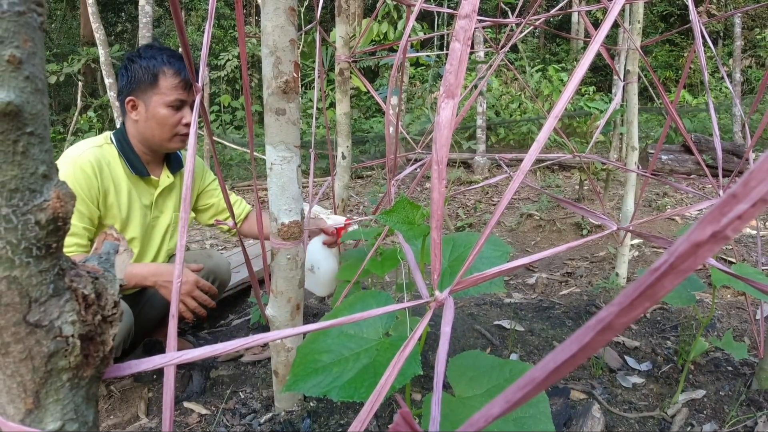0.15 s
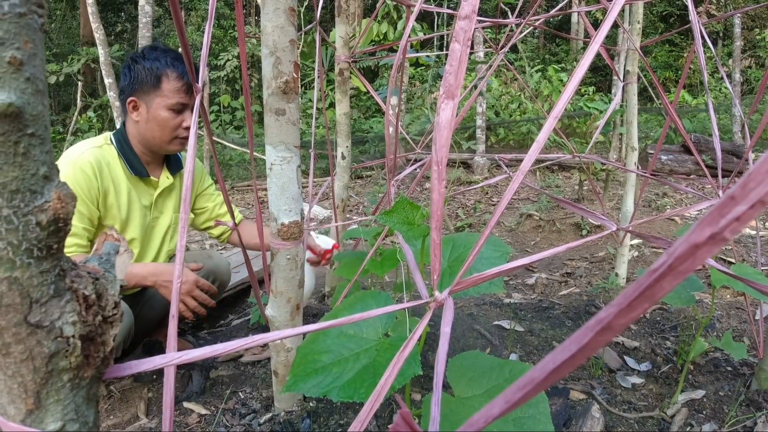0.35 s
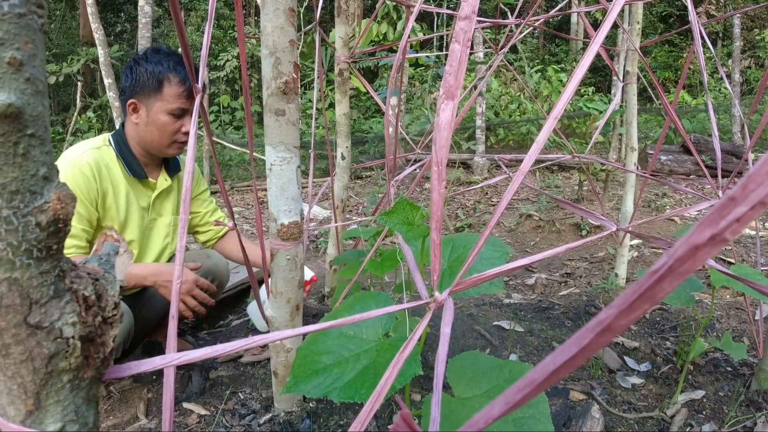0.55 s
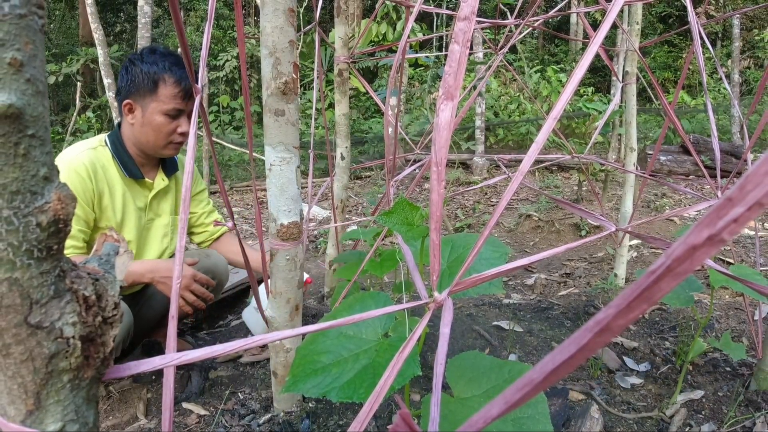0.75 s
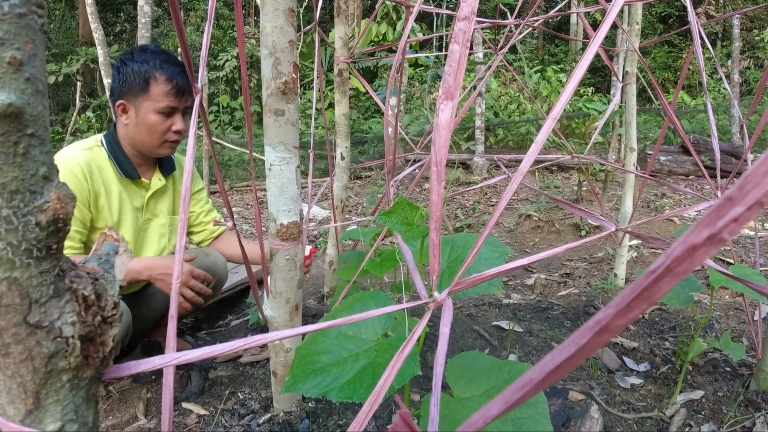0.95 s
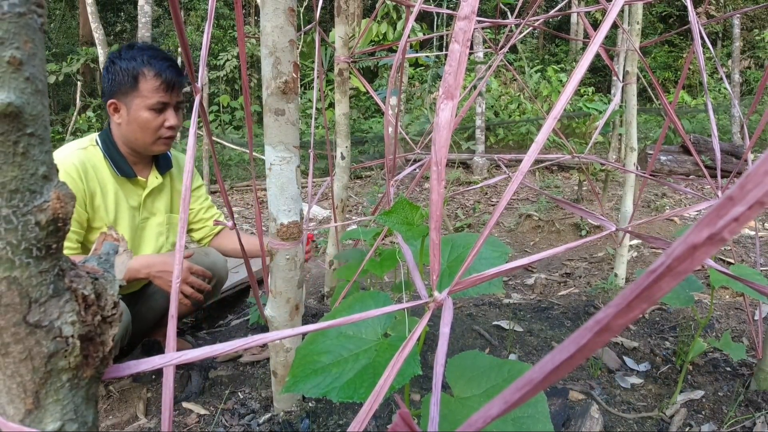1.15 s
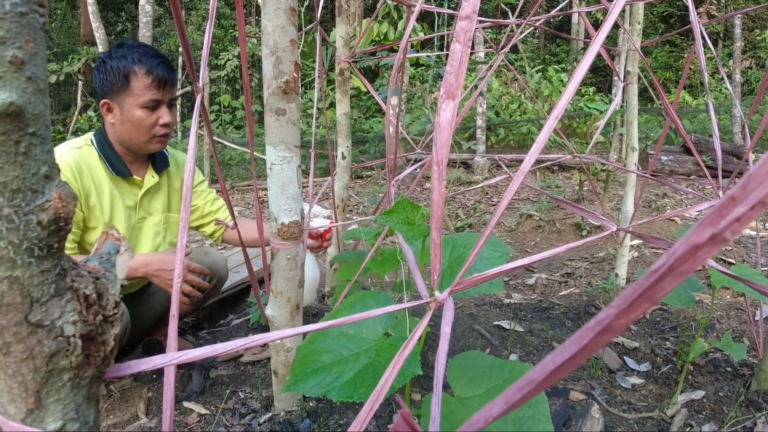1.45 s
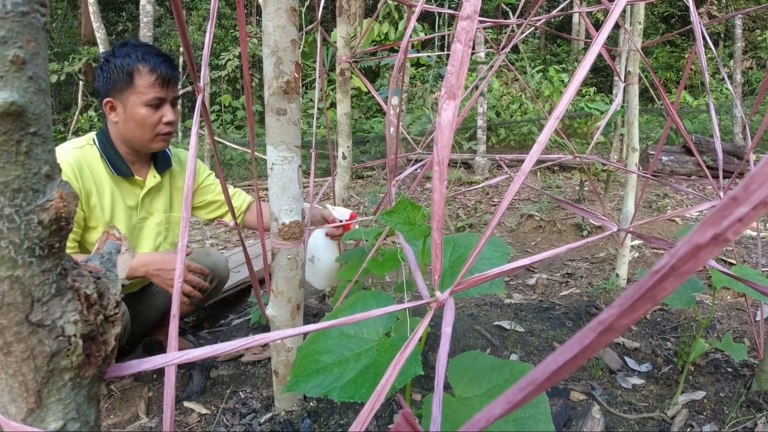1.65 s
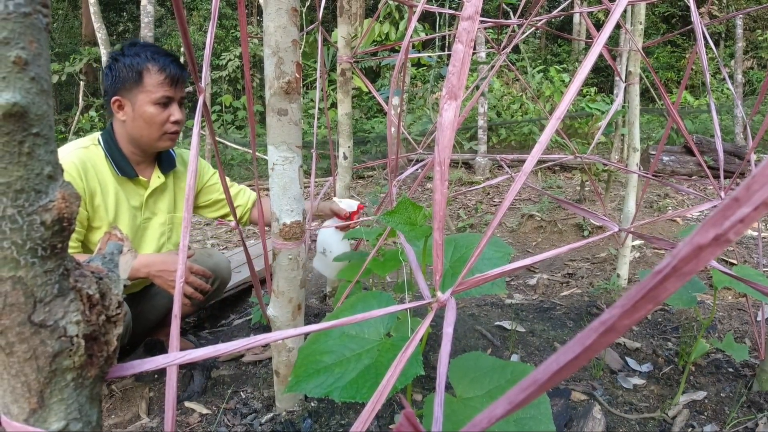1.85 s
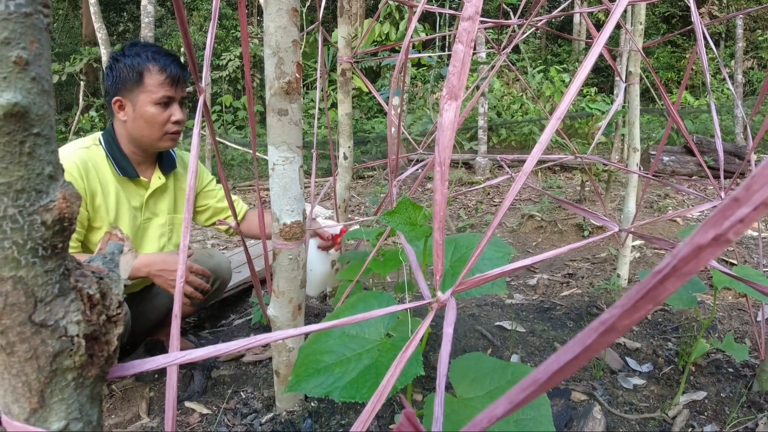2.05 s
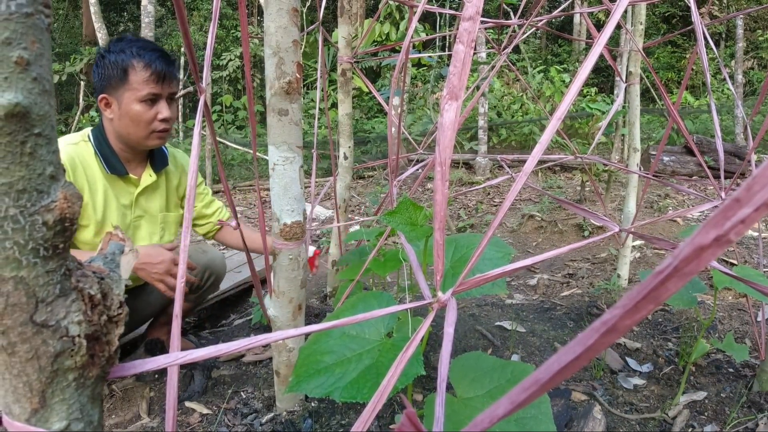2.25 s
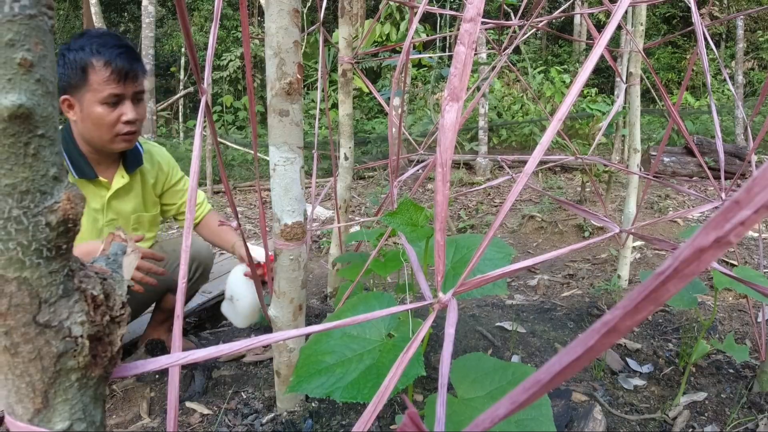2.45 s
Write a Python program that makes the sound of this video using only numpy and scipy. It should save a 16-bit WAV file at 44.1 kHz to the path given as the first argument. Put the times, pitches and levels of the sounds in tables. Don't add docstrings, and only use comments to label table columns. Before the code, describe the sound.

A trigger spray bottle is pumped eight times at a steady quick pace, each short hissing spurt spattering on bark, with plastic clicks between; close microphone outdoors, soft insects and a faint distant engine.

```python
import sys
import numpy as np
from scipy import signal
from scipy.fft import rfft, irfft
from scipy.io import wavfile
from scipy.ndimage import uniform_filter1d

SR = 44100
rng = np.random.default_rng(int(sys.argv[2]) if len(sys.argv) > 2 else 0)


def digitize_waveform(pressure):
    field = np.atleast_2d(pressure).T
    bounded = np.clip(field, -1, 1)
    quanta = np.round(bounded * 32767).astype(np.int16)
    wavfile.write(sys.argv[1], SR, quanta)


def linear_from_db(decibels):
    return 10 ** (np.asarray(decibels, float) / 20)


N = 114660
T = np.arange(N) / SR
CUTOFF_HZ = 15650


def rms_one(x):
    return x / np.sqrt(np.mean(x ** 2) + 1e-20)


def colour(x, points):
    hz, db = np.transpose(points)
    f = np.maximum(np.fft.rfftfreq(N, 1 / SR), 1)
    gain = linear_from_db(np.interp(np.log(f), np.log(hz), db, left=-120, right=-120))
    return rms_one(irfft(rfft(x) * gain, N))


def band(x, low_hz, high_hz):
    f = np.fft.rfftfreq(N, 1 / SR)
    return irfft(rfft(x) * ((f > low_hz) & (f < high_hz)), N)


def drift(rate_hz):
    r = np.exp(-2 * np.pi * rate_hz / SR)
    noise = rng.standard_normal(N + SR)
    return rms_one(signal.lfilter([1], [1, -2 * r, r * r], noise)[SR:])


def reson(x, hz, width_hz):
    r = np.exp(-np.pi * width_hz / SR)
    poles = [1, -2 * r * np.cos(2 * np.pi * hz / SR), r * r]
    return signal.lfilter([(1 - r * r) / 2, 0, (r * r - 1) / 2], poles, x)


def narrow(noise, hz, width_hz):
    return rms_one(reson(reson(noise, hz, width_hz), hz, width_hz))


# start in seconds, length in seconds, spatter level in dB,
# dribble in dB re spatter.
STROKES = [
    (0.208, 0.118, -26.5, -24.5),
    (.491, 0.11406, -27.5, -19.5),
    (0.776, 0.1166, -29.5, -29),
    (1.036, 0.113, -31.5, -11),
    (1.309, 0.11304, -28, -35),
    (1.611, 0.1152, -28.5, -14.5),
    (1.929, 0.1246, -26, -21),
    (2.217, 0.1042, -26, -25),
]
# mid hiss, whistle and top hiss in dB re spatter,
# lower and upper ring of the wetted bark in Hz.
JETS = [(-8, -22.5, -15.5, 2110, 2761), (-11, -20.5, -18.5, 2377, 2559), (-10.5, -20.5, -23, 1711, 2726),
        (-6, -12, -11, 2270, 2722), (-11, -18.5, -17.5, 2088, 2590), (-8.5, -21.5, -15.5, 2003, 2754),
        (-8, -20, -8, 1894, 2568), (-11.5, -24, -18, 2001, 2703)]
# lower ring in dB, upper ring in dB.
AIMS = [(0.96, 1.75), (2.5, -1), (8, -3), (5.07, 1.55), (8, -3.5), (-0.5, -2), (-2, 4), (-2.83, -10.3)]
SKIRT_DB = [-3.5, -4, -4.5, 1.5, -2, -4.5, -7, -5.55]
# time in seconds, level in dB.
SURGES = [(.225, 2), (.25, 1.5), (.31, 1), (0.523, 2), (.545, 3), (0.564, 1.5), (0.584, 2.5), (0.788, 1),
          (.803, 0.5), (.83, 1.5), (0.861, -1.5), (.878, 0.5), (1.051, 1.5), (1.106, 0), (1.13, -3),
          (1.335, 3.5), (1.385, 4.5), (1.41, 4), (1.641, 3), (1.665, 2.5), (1.686, 5.5), (1.705, 1),
          (1.947, 1), (1.962, 4.5), (1.981, 3), (2.005, 2.5), (2.03, 1), (2.23, -0.5), (2.247, 1),
          (2.275, 3.5), (2.3, 1)]
SURGE_S = .007
RISE_DB_PER_S, FALL_DB_PER_S, DRIBBLE_DB_PER_S = 920.5, 715.5, 107.5
AIM_WIDTH_HZ, AIM_DB = 146.9, -0.5
SKIRT_HZ = 1544
DRIBBLE_TOP_HZ, DRIBBLE_TOP_DB = 2896, -9.5


def spatter():
    surge_db = sum(db * np.exp(-((T - s) / SURGE_S) ** 2 / 2) for s, db in SURGES)
    drops = linear_from_db(-4.5 + surge_db) * droplets()
    sputter = linear_from_db(3.23 * drift(27))
    skirt = band(drops, 0, SKIRT_HZ)
    bright = band(drops, DRIBBLE_TOP_HZ, CUTOFF_HZ)
    out = np.zeros(N)
    for stroke_row, jet_row, skirt_db, (low_db, high_db) in zip(STROKES, JETS, SKIRT_DB, AIMS):
        s, length, db, dribble_db = stroke_row
        low_hz, high_hz = jet_row[3:]
        t = T - s
        opening = RISE_DB_PER_S * (t - .012)
        closing = FALL_DB_PER_S * (length - .015 - t)
        stroke = linear_from_db(np.minimum(0, np.minimum(opening, closing)))
        dribble_fade = linear_from_db(dribble_db - DRIBBLE_DB_PER_S * np.maximum(t - length, 0))
        dribble = np.clip(t / length, 0, 1) * sputter * dribble_fade
        bark = linear_from_db(low_db) * reson(drops, low_hz, AIM_WIDTH_HZ)
        bark = bark + linear_from_db(high_db) * reson(drops, high_hz, AIM_WIDTH_HZ)
        wet = drops + linear_from_db(AIM_DB) * bark + (linear_from_db(skirt_db) - 1) * skirt
        out += linear_from_db(db) * ((stroke + dribble) * wet + dribble * (linear_from_db(DRIBBLE_TOP_DB) - 1) * bright)
    return out


# frequency in Hz, density in dB per Hz.
SPATTER = [(240, -82.5), (400, -37), (562, -21), (1240, -5.5), (1440, -5.5), (2160, -0.5), (3040, -2),
           (3480, -16), (6000, -18.5), (7800, -30.5), (13200, -120)]
DROPS_PER_S, DROP_SPREAD_DB = 9000, 2
DROP_CYCLES, DROP_RING_DB = 34.35, 1.5
FLUTTER_DB = 0.8634


def droplets():
    sizes = linear_from_db(DROP_SPREAD_DB * np.minimum(rng.exponential(1, N), 3)) * rng.choice([-1, 1], N)
    hits = sizes * (rng.random(N) < DROPS_PER_S / SR)
    dealt = rng.integers(0, 36, N)
    rings = np.zeros(N)
    for k, hz in enumerate(np.geomspace(600, 5000, 36)):
        struck = hits * (dealt == k) + 1e-18
        rings += rms_one(reson(struck, hz, 1.947 * hz / DROP_CYCLES)) * np.sqrt(hz)
    both = rms_one(hits) + linear_from_db(DROP_RING_DB) * rms_one(rings)
    return colour(both, SPATTER) * linear_from_db(FLUTTER_DB * drift(18.7))


# frequency in Hz, density in dB per Hz.
MID_HISS = [(2060, -22), (3500, 9.5), (4160, 10), (4490, 7), (5600, 4), (6160, 7), (7100, 1.5),
            (11000, -12), (14300, 5), (22000, -120)]
TOP_HISS = [(6180, -48), (10500, -17.5), (11200, -17), (12700, -12.5), (13200, -3.5), (14600, 1.5),
            (15600, -4), (16000, -27.5)]
WHISTLE_HZ, WHISTLE_WIDTH_HZ = 8328, 763
MID_DB, TOP_DB, WHISTLE_DB = 2.5, 4.5, 4
TOP_OPENS_S = 0.0201


def nozzle():
    mid = streaky(colour(rng.standard_normal(N), MID_HISS), 3050, 13000) * linear_from_db(1.15 * drift(40))
    top = streaky(colour(rng.standard_normal(N), TOP_HISS), 10000, 16000) * linear_from_db(1.47 * drift(70))
    whistle = narrow(rng.standard_normal(N), WHISTLE_HZ, WHISTLE_WIDTH_HZ)
    out = np.zeros(N)
    for (s, length, db, _), (mid_db, whistle_db, top_db, _, _) in zip(STROKES, JETS):
        t = T - s
        whistle_jet = jet(t - 0.549 * length, rise=224, fall=429.5, round_s=0.0469)
        mid_jet = jet(t - 0.5414 * length, rise=372.5, fall=462, round_s=0.0469)
        top_jet = jet(t - 0.629 * length, rise=289.5, fall=520, round_s=0.0316)
        top_opening = np.clip((t - TOP_OPENS_S) / 0.012, 0, 1) ** 2
        out += linear_from_db(db + whistle_db + WHISTLE_DB) * whistle_jet * np.clip(t / 0.036, 0, 1) * whistle
        out += linear_from_db(db + mid_db + MID_DB) * mid_jet * np.clip(t / 0.0422, 0, 1) * mid
        out += linear_from_db(db + top_db + TOP_DB) * top_jet * top_opening * top
    return out


def jet(t, rise, fall, round_s):
    return linear_from_db(-np.where(t < 0, rise, fall) * (np.sqrt(t ** 2 + round_s ** 2) - round_s))


STREAK_HZ, STREAK_DB, STREAK_PER_S = 260, 3.8, 5


def streaky(x, low_hz, high_hz):
    edges = np.arange(low_hz, high_hz, STREAK_HZ)
    return rms_one(sum(band(x, hz, hz + STREAK_HZ) * linear_from_db(STREAK_DB * drift(STREAK_PER_S)) for hz in edges))


# time in seconds, peak in dB, ring in Hz,
# snap in dB re ring.
TICKS = [(0.3374, -36.5, 2980, 0), (0.3631, -36.5, 2236, -16.5), (0.414, -36, 2107, -19),
         (0.4214, -36, 2175, -14.5), (0.4723, -29.5, 2256, -12.5), (0.6953, -33.5, 2476, -27.5),
         (0.9491, -32.5, 2495, -16.5), (1.1777, -26.5, 2655, -14), (1.2244, -21, 2193, -15),
         (1.285, -38, 1987, -4), (1.4396, -30.5, 2205, -7.5), (1.501, -21.5, 2228, -25.5),
         (1.526, -39.5, 2070, -10), (1.7654, -35.5, 2310, -25.5), (1.798, -21.5, 2357, -17.5),
         (1.8972, -16.5, 2376, -17.5), (2.0658, -29.5, 2412, -4), (2.1292, -22, 2445, -19.5),
         (2.1927, -42.5, 2673, -3.5), (2.388, -25.5, 2353, -30.5), (2.4, -35, 2325, -26.5)]
TAPS = [(0.002, -28.5, 2670, -9.5), (0.047, -26.5, 2378, -15), (0.057, -31.5, 2170, -15),
        (0.0907, -45, 2300, -12.5), (0.1072, -28, 2525, -6), (0.1118, -26, 2640, -14.5),
        (0.6842, -33, 2540, -19.5), (0.7356, -40.5, 2930, -0.5), (1.0125, -35.5, 2612, -22),
        (1.196, -32, 1484, -2), (1.462, -34, 2561, -4), (1.7782, -28, 2379, -12)]
# time in seconds, peak in dB.
KNOCKS = [(0.102, -85), (0.22, -50.5), (0.472, -43.5), (0.776, -47), (1.032, -48), (1.285, -53),
          (1.608, -50), (1.69, -56), (2.009, -53), (2.203, -48.5)]
KNOCK_HZ, KNOCK_T60_S, KNOCK_DB = 271, 0.059, 6.5


def trigger():
    noise = rng.standard_normal(N)
    snap = rms_one(band(noise, 500, 3800))
    rattle = rms_one(reson(reson(noise, 1748, 780), 2493, 680))
    out = ticks(TICKS, .026, .0015, snap, rattle) + ticks(TAPS, .016, .0007, snap, rattle)
    for s, db in KNOCKS:
        out += linear_from_db(db + KNOCK_DB) * ring(T - s, KNOCK_HZ, KNOCK_T60_S, 0.00183)
    return out


TICK_DB, SNAP_DB, TICK_TAIL_DB, TICK_TAIL_T60_S = -6.5, -1, -19, 0.075
TICK_UPPER, TICK_UPPER_DB = 1.163, -15.5


def ticks(rows, t60, rise_s, snap, rattle):
    out = np.zeros(N)
    for s, db, hz, snap_db in rows:
        near = slice(max(int((s - .02) * SR), 0), int((s + .15) * SR))
        t = T[near] - s - 1.3 * rise_s
        rise, after = np.exp(np.minimum(t, 0) / rise_s), np.maximum(t, 0)
        decay_db = -60 * after / t60
        upper = linear_from_db(TICK_UPPER_DB + decay_db) * np.sin(2 * np.pi * TICK_UPPER * hz * t)
        body = linear_from_db(decay_db) * (np.sin(2 * np.pi * hz * t) + upper)
        tail = linear_from_db(SNAP_DB + snap_db + decay_db) * snap[near]
        tail = tail + linear_from_db(TICK_TAIL_DB - 60 * after / TICK_TAIL_T60_S) * rattle[near]
        out[near] += linear_from_db(db + TICK_DB) * rise * (body + tail)
    return out


def ring(t, hz, t60, soft):
    t = np.maximum(t, 0)
    return (1 - np.exp(-(t / soft) ** 2)) * linear_from_db(-60 * t / t60) * np.sin(2 * np.pi * hz * t)


# start in seconds, length in seconds, level in dB, from Hz, to Hz.
RUNOFF = [
    (1.15, 0.11, -50, 1650, 1400),
    (1.42, 0.065, -51, 1400, 1200),
    (1.05, 0.022, -42, 650, 850),
    (0.14, 0.042, -55.5, 1000, 1250),
]


def runoff():
    out = np.zeros(N)
    for s, length, db, from_hz, to_hz in RUNOFF:
        u = np.clip((T - s) / length, 0, 1)
        tone = np.sin(2 * np.pi * np.cumsum(from_hz + (to_hz - from_hz) * u) / SR)
        out += linear_from_db(db) * np.sin(np.pi * u) ** .5 * drift(81.0) * tone
    return out


# frequency in Hz, density in dB per Hz.
AIR = [(12, -20.5), (20, 12.5), (79, -8), (1150, -22.5), (4540, -27.5), (5380, -37.5), (6360, -29),
       (15500, -40.5), (16000, -44.5)]
AIR_DB = -48.5
# pitch in Hz, width in Hz, level in dB, patchiness in dB.
CHORUS = [
    (2350, 834, -59.5, 1),
    (4627, 208, -63, 0.5),
    (4511, 182, -61.5, 6),
    (6218, 685, -63, 1.5),
    (6576, 73, -69.5, 6),
]
# time in seconds, level in dB.
CHORUS_SWELL = [(0, -3.5), (.3, -2.5), (.6, -6), (1.3, -8.5), (1.5, 3), (2, -8.07), (2.6, -3)]
# start in seconds, length in seconds, level in dB, pitch in Hz.
TRILLS = [
    (0, .5, -65, 8220),
    (2.05, .51, -66, 8250),
    (0, .11, -66, 8500),
    (2.06, .14, -71, 9300),
    (2.3, .12, -69, 9300),
]
CRICKET_WIDTH_HZ, CRICKET_PER_S, CRICKET_DEPTH = 90, 45, .45


def garden():
    out = linear_from_db(AIR_DB) * colour(rng.standard_normal(N), AIR)
    swell_db = np.interp(T, *np.transpose(CHORUS_SWELL))
    for hz, width_hz, db, patchy_db in CHORUS:
        singers = narrow(rng.standard_normal(N), hz, width_hz)
        patches_db = patchy_db * (drift(17.1) + 0.173 * drift(2.26))
        out += linear_from_db(db + (4000 < hz < 5000) * swell_db + patches_db) * singers
    noise = rng.standard_normal(N)
    pulse = 1 + CRICKET_DEPTH * np.sin(2 * np.pi * CRICKET_PER_S * T + 0.85 * drift(1.9))
    for s, length, db, hz in TRILLS:
        fade = np.clip(np.minimum(T - s + 0.0323, s + length - T) / 0.012, 0, 1)
        out += linear_from_db(db) * fade * pulse * narrow(noise, hz, CRICKET_WIDTH_HZ)
    return out


# time in seconds, firing rate in Hz, orders 2, 3 and 4 in dB.
ENGINE = [(0.0, 23.73, -81, -76.5, -78.5), (0.06, 25.08, -42.5, -59.5, -67), (0.11, 24.15, -56, -51.5, -58),
          (0.34, 22.99, -51, -61, -57), (0.48, 23.94, -53.5, -50.5, -63.5), (0.67, 24.12, -49, -71.5, -64),
          (0.79, 25, -52.5, -54.5, -59.5), (1.2, 24.09, -45.5, -61.5, -57), (1.31, 23.79, -45, -40.5, -46),
          (1.44, 21.28, -54, -40, -42), (1.61, 22.94, -38, -47.5, -40.5), (1.891, 22.15, -53, -40, -48),
          (2.06, 21.93, -55, -45.5, -44), (2.32, 20.91, -59, -43.5, -45.5), (2.54, 20.38, -50, -51, -52.5),
          (2.6, 20.97, -57, -46.5, -44.5)]
ORDER_RAD = [.3, .6, .9, 1.2, 1.5]
FIRST_DB, FIFTH_DB, WOBBLE_DB = -21, -10.5, 2


def engine():
    s, *columns = np.transpose(ENGINE)
    hz, two, three, four = [np.interp(T, s, c) for c in columns]
    turn = 2 * np.pi * np.cumsum(hz) / SR
    out = np.zeros(N)
    for k, db in enumerate([two + FIRST_DB, two, three, four, four + FIFTH_DB]):
        level = np.sqrt(2) * linear_from_db(db + WOBBLE_DB * drift(19.8))
        out += level * np.sin((k + 1) * turn + ORDER_RAD[k])
    return out


def scene():
    return (spatter() + nozzle() + trigger() + runoff() + garden() + engine())[None]


def roll_off(x):
    return signal.sosfilt(signal.butter(12, 16490, fs=SR, output="sos"), x)


# low Hz, high Hz, seconds from stroke
# start to silence, seconds from stroke end to return, strokes concerned counted from 0.
DROPOUTS = [(9750, 11100, .016, .014, [0, 1]), (9750, 11100, .028, .012, [2, 3, 5, 7]),
            (10600, 11100, .035, 0, [4]), (9800, 10200, .035, -.01, [4]), (6900, 7400, .03, .01, [5, 7]),
            (6900, 7400, .03, -.025, [1]), (6900, 7400, .03, -.06, [4]), (13700, 14150, .165, .16, [3]),
            (14450, 15000, .175, .16, [3]), (15000, 15700, .27, .3, [7])]
# start in seconds, length in seconds.
DIPS = [
    (.475, .035),
    (1.307, .02),
    (1.908, .036),
    (2.222, .015),
]
DIP_LOW_HZ, DIP_SHARE = 9500, .55


def record(dry):
    x = band(dry[0], 0, CUTOFF_HZ)
    for low_hz, high_hz, late, over, hit in DROPOUTS:
        silent = np.zeros(N)
        for k in hit:
            s, length = STROKES[k][:2]
            silent += (T > s + late) * (T < s + length + over)
        x = x - band(x, low_hz, high_hz) * uniform_filter1d(silent, size=512)
    dip = sum((T > s) * (T < s + length) for s, length in DIPS)
    x = x - DIP_SHARE * band(x, DIP_LOW_HZ, CUTOFF_HZ) * uniform_filter1d(dip * 1.0, size=256)
    return roll_off(x[None])


dry = scene()
out = record(dry)
digitize_waveform(out)
```